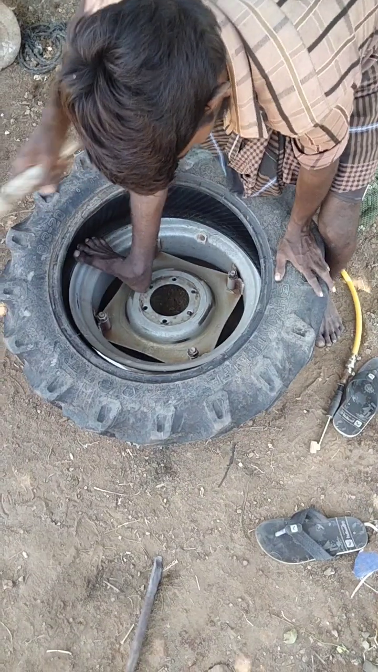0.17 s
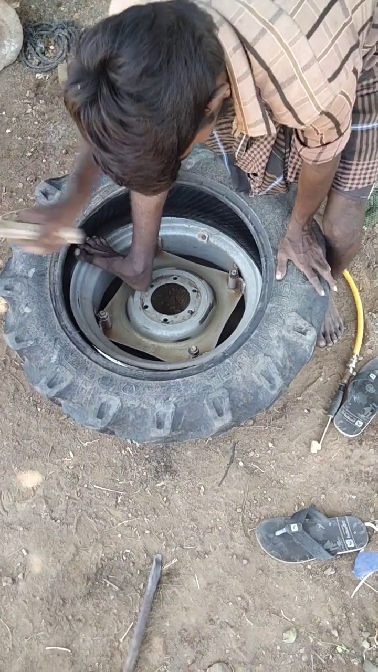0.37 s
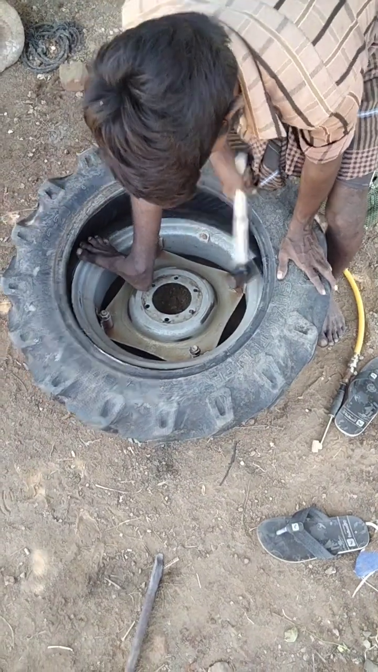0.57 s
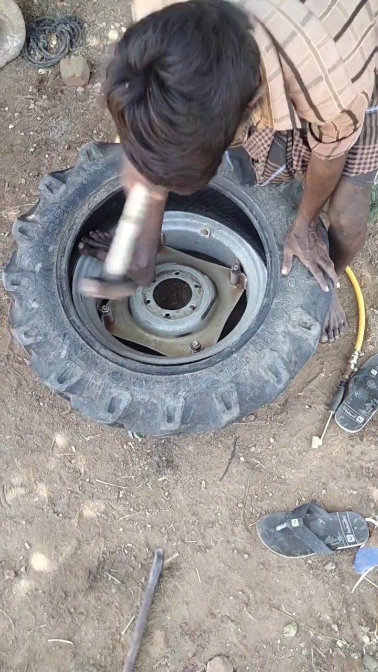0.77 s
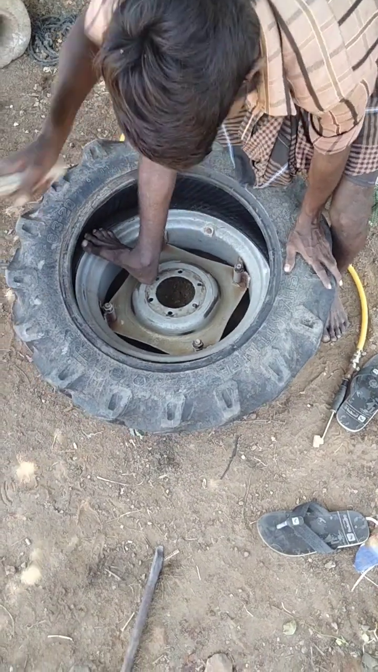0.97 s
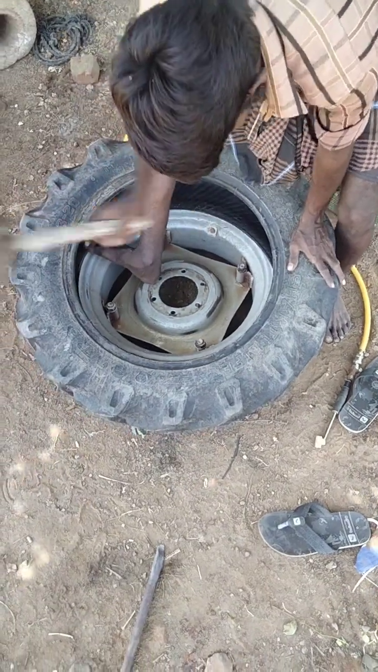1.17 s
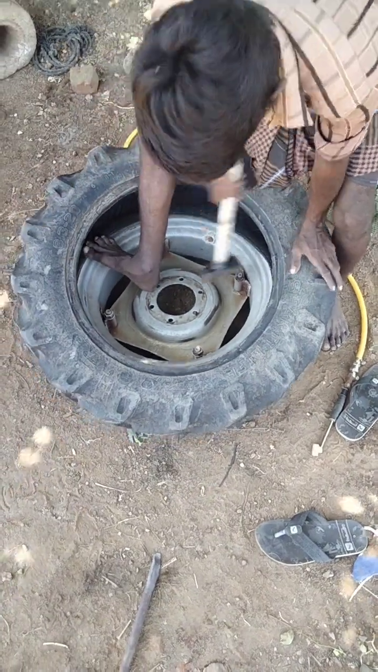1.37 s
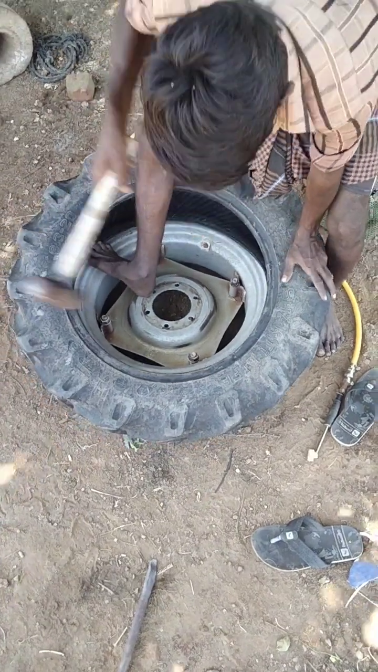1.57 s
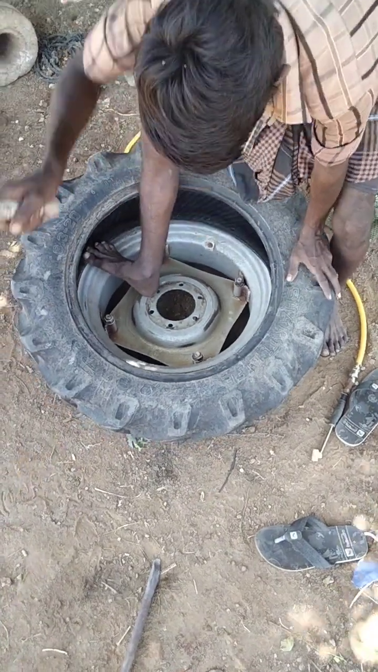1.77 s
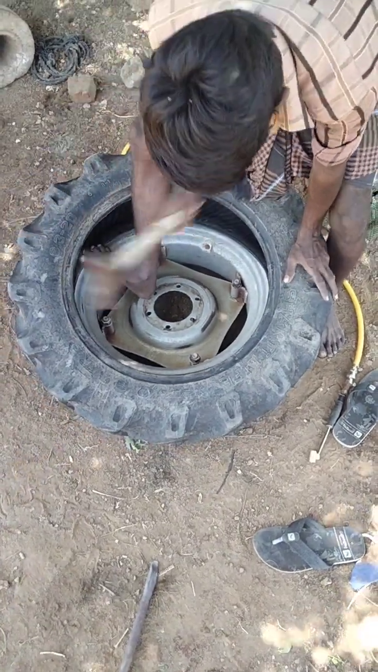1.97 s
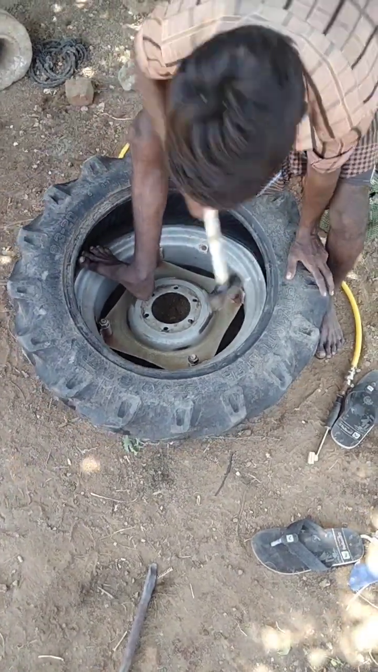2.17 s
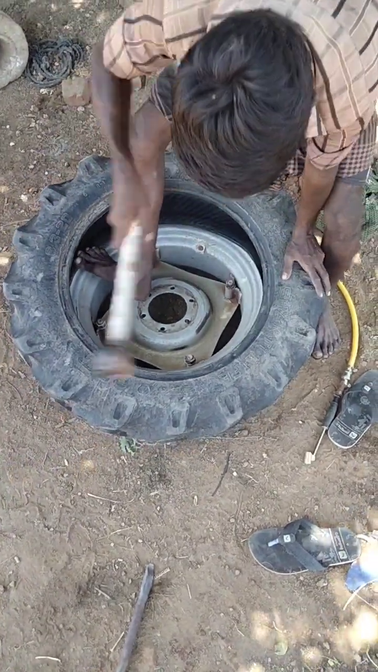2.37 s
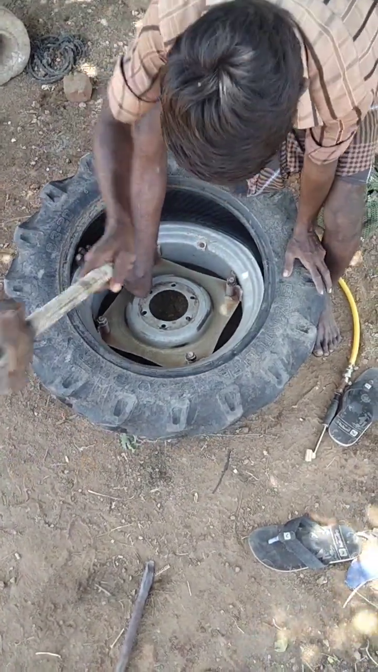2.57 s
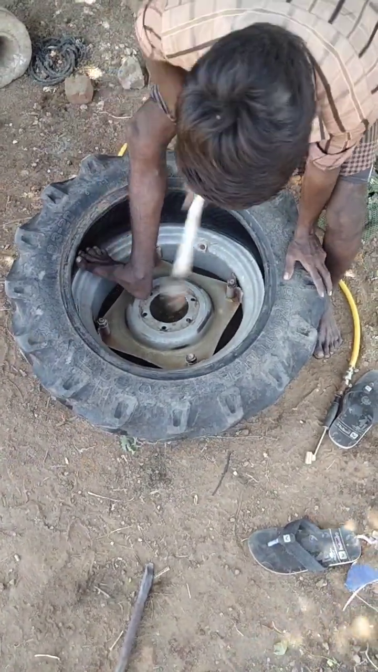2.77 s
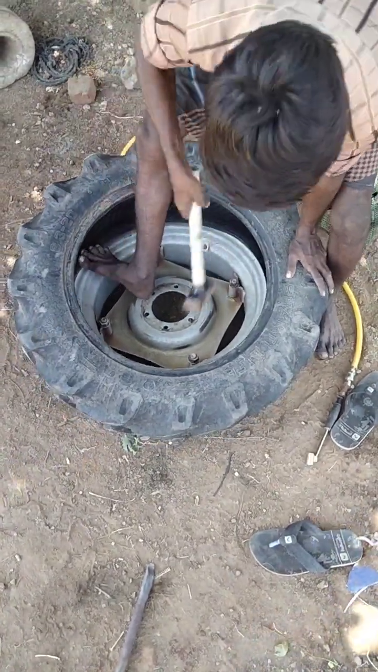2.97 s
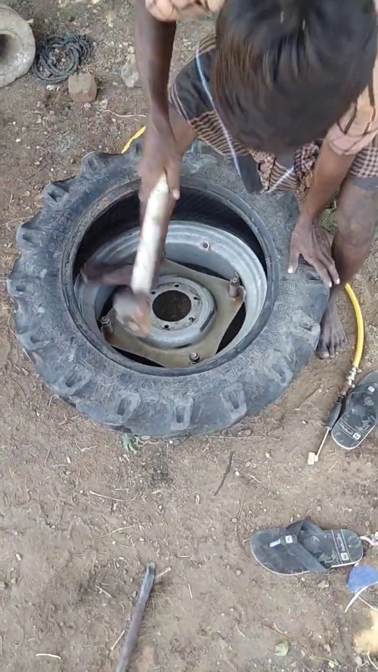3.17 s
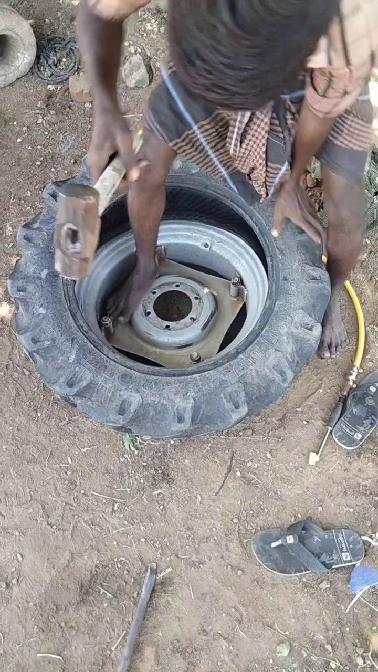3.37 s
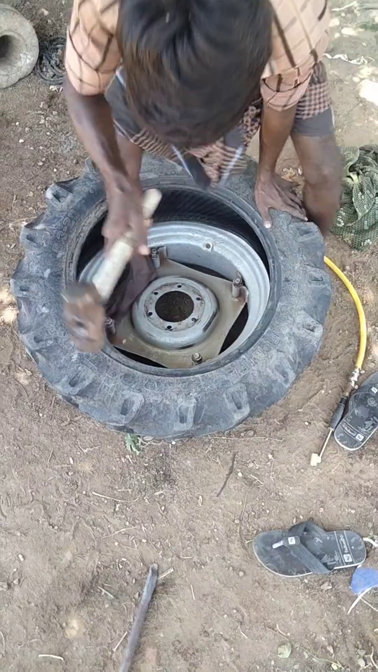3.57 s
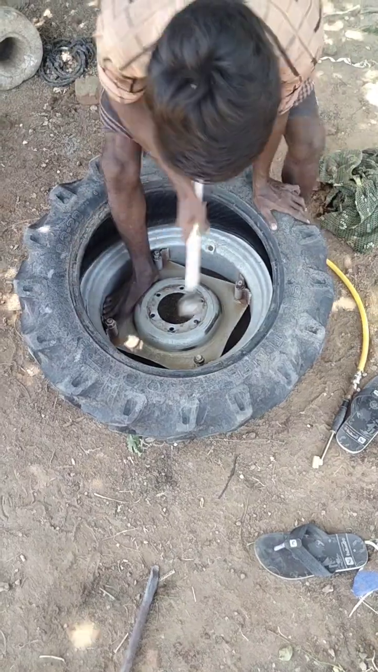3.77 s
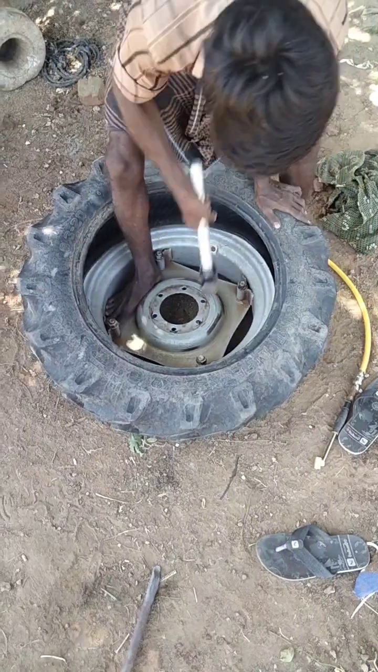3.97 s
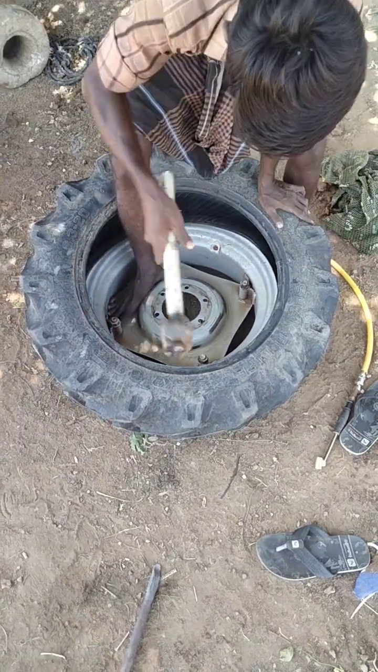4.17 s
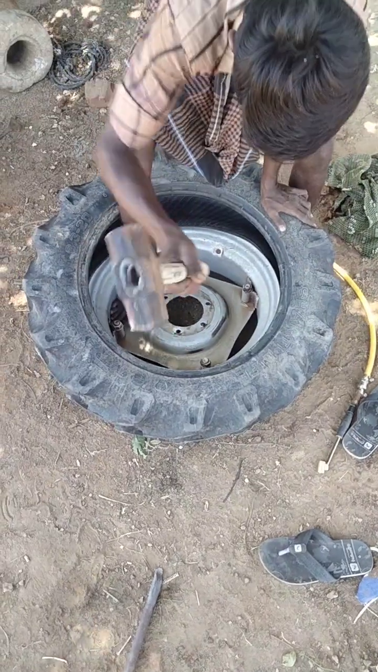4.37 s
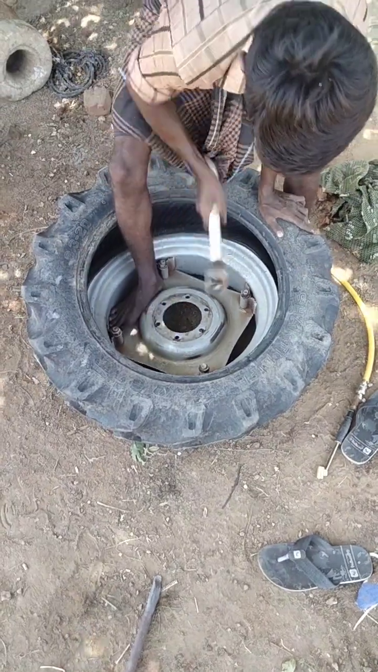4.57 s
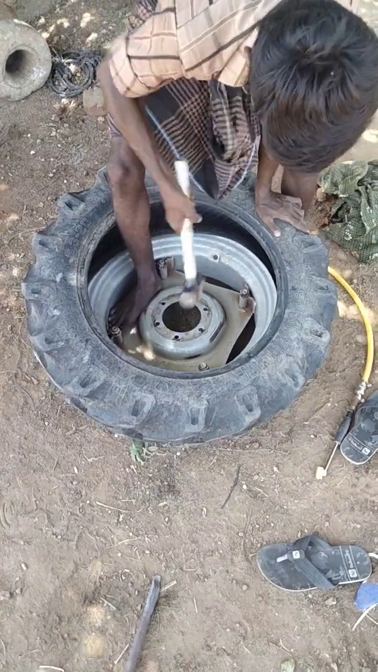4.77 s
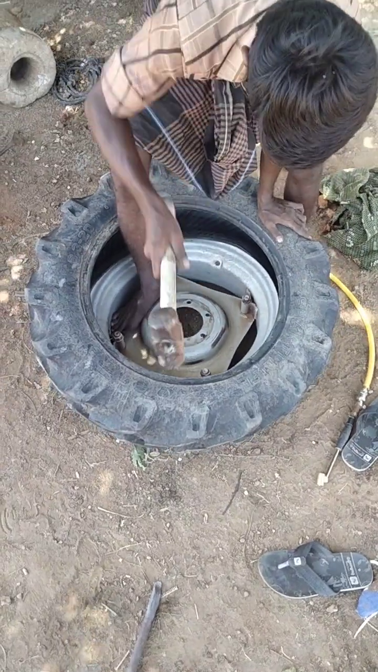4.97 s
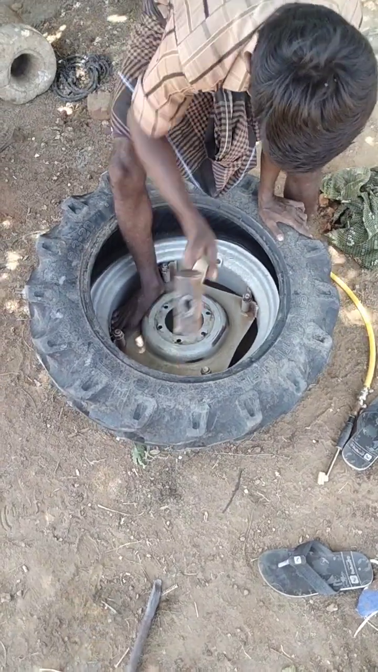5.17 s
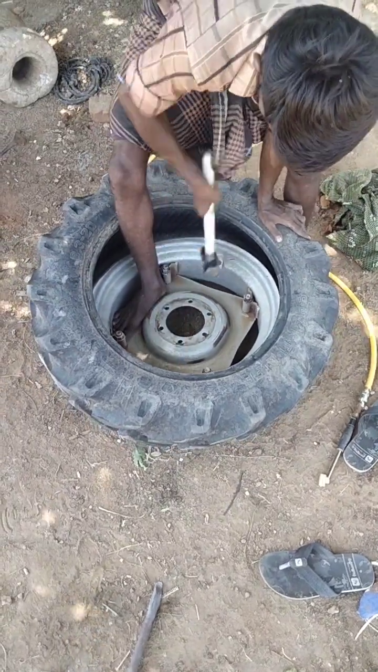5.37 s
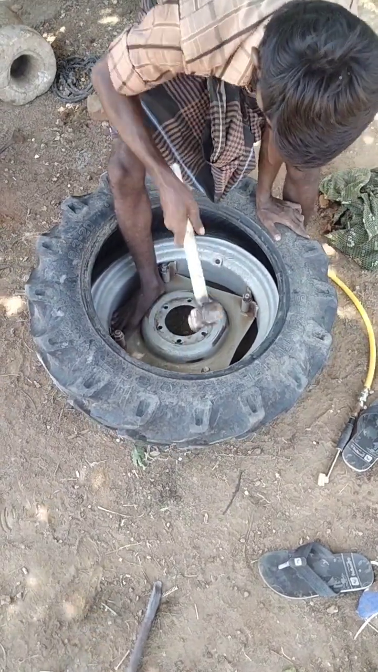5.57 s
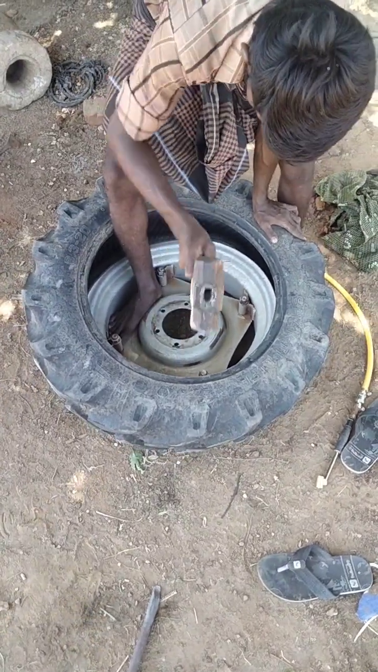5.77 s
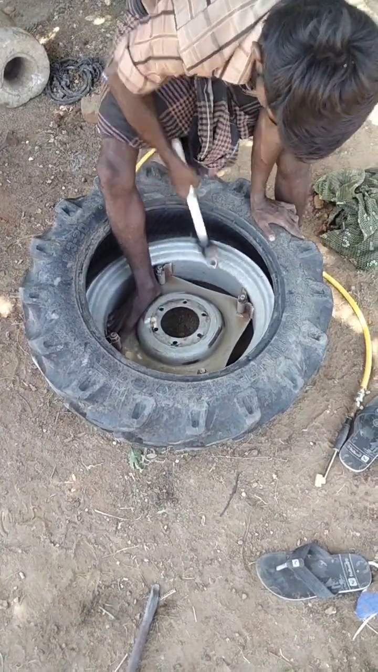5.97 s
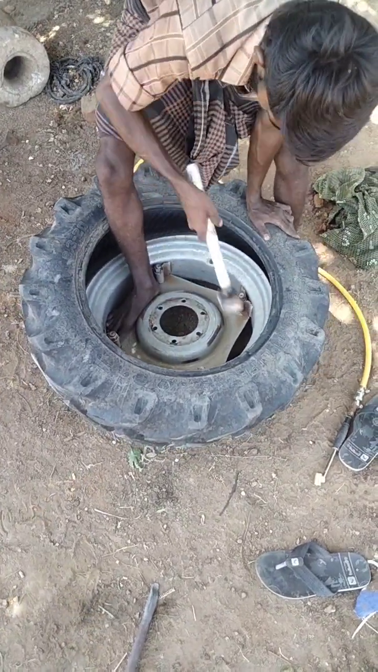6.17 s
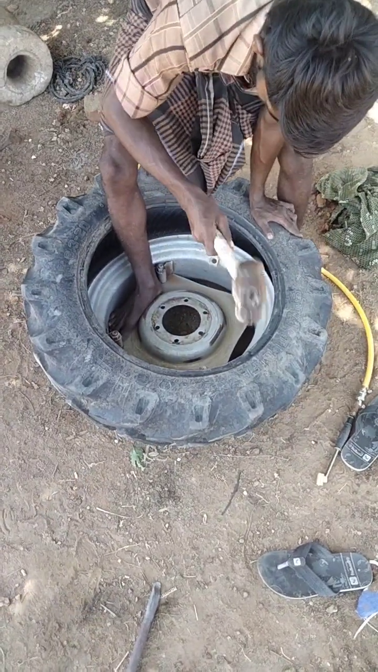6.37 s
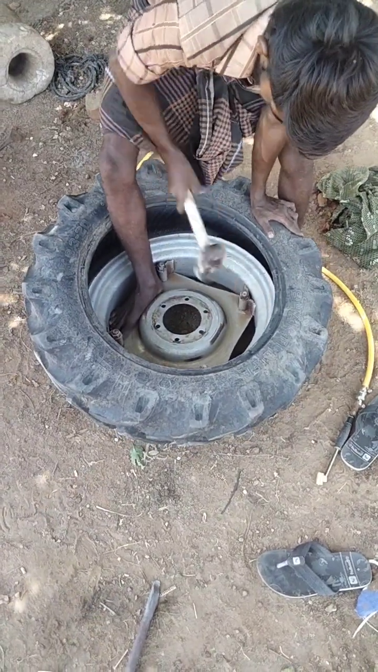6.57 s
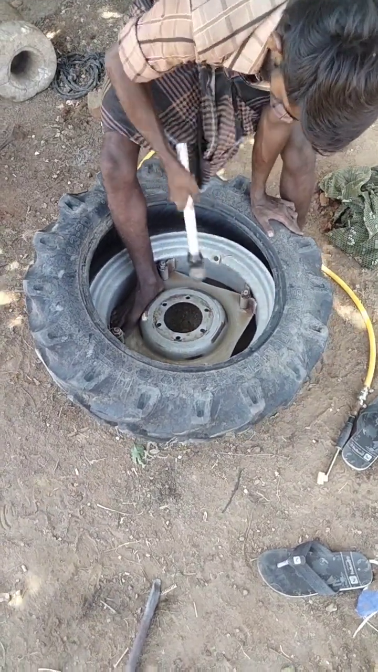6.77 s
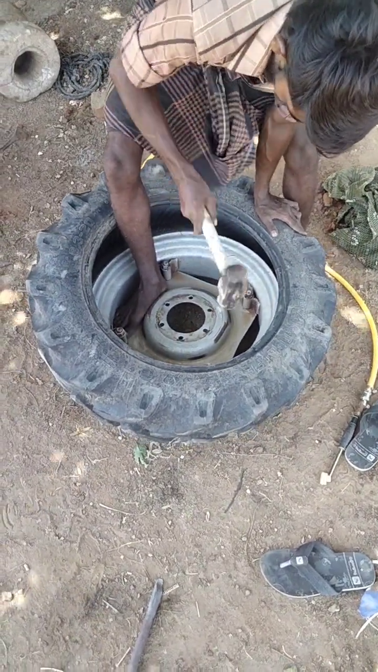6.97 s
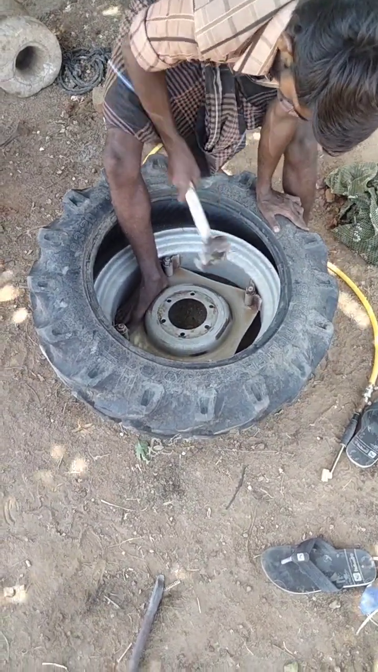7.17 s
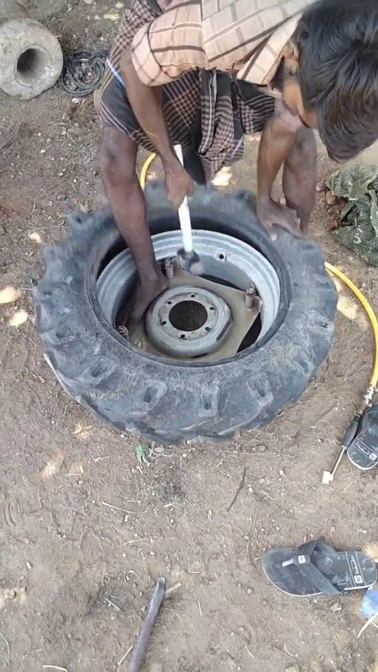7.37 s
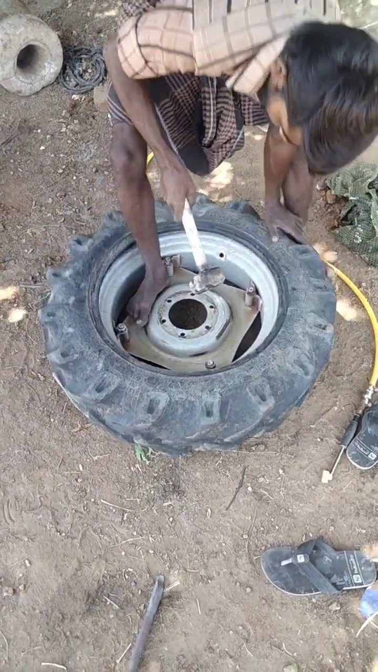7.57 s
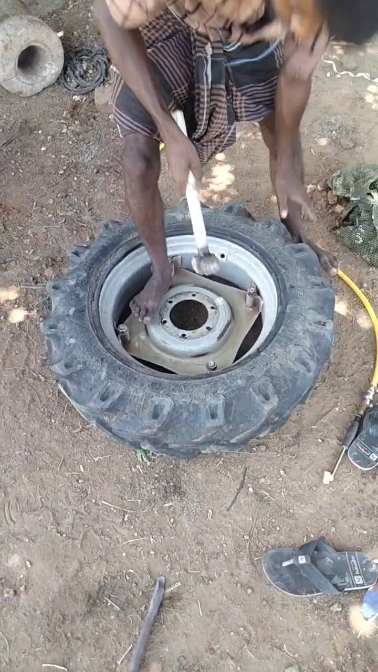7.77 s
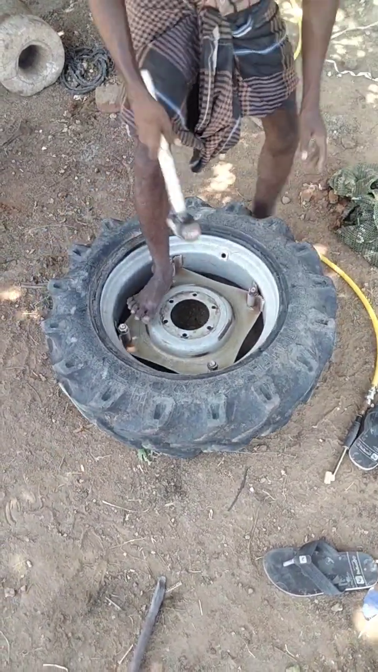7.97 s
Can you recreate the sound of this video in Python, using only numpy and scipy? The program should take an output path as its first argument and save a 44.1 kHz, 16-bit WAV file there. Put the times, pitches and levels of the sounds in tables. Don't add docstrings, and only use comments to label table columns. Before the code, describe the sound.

Ten spaced hammer blows land on a tractor tyre and steel rim, thudding and ringing, over a chugging compressor, thin air hiss and buffeting wind.

```python
import sys
import numpy as np
from scipy import signal
from scipy.fft import rfft, irfft, next_fast_len
from scipy.io import wavfile
from scipy.ndimage import uniform_filter1d, minimum_filter1d

SR = 44100
rng = np.random.default_rng(int(sys.argv[2]) if len(sys.argv) > 2 else 0)


def voltage_ratio(decibels):
    exponent = np.asarray(decibels, float) / 20
    return 10 ** exponent


def persist_wave(psi):
    counts = np.round(np.clip(psi, -1, 1) * 32767).astype(np.int16)
    wavfile.write(sys.argv[1], SR, np.atleast_2d(counts).T)


N = 353814
TURNS_PER_S = 12.331
RING_SIZE = 9000


def evened(x):
    return x / np.sqrt(np.mean(x ** 2) + 1e-20)


def read(points, hz):
    f, value = np.transpose(points)
    return np.interp(np.log(hz + 1), np.log(f + 1), value)


def add(mix, s, sound):
    part = mix[round(s * SR):][:len(sound)]
    part += sound[:len(part)]


def bumps(rows, t):
    return sum(high * np.exp(-(2 * (t - middle) / length) ** 2) for middle, length, high in rows)


def shaped(gain_at):
    size = next_fast_len(N, real=True)
    hz = np.fft.rfftfreq(size, 1 / SR)
    a, b = rng.standard_normal((2, len(hz)))
    return evened(irfft((a + 1j * b) * gain_at(hz), size)[:N])


def coloured(spectrum):
    return shaped(lambda hz: voltage_ratio(read(spectrum, hz)))


def fuzzy(centre_hz, width):
    return shaped(lambda hz: 1 / (1 + (2 * (hz - centre_hz) / width) ** 2))


def wander(top_hz):
    return fuzzy(0, 2 * top_hz)


def ring(hz, db, t60, start=0, size=RING_SIZE):
    t = np.arange(size)[:, None] / SR
    fade = voltage_ratio(-60 * t / t60) + voltage_ratio(-26.5 - 22 * t / t60)
    return voltage_ratio(db) * fade * np.sin(2 * np.pi * (hz * t + start)) * (1 - t / t[-1])


# frequency in Hz, level in dB per Hz.
YARD = [(59, -5), (100, 1), (166, -4.5), (295, -7.5), (424, -7), (535, -1), (634, -15), (930, -8.5),
        (1200, -16), (2130, -15.5), (4570, -20.5), (7290, -21), (8280, -12.5), (9210, -23), (16000, -25)]
# frequency in Hz, width in Hz, change in dB.
ECHOES = [(4600, 670, -6), (12200, 500, -2), (3150, 160, 3), (12700, 120, 5), (1620, 100, 2)]


def yard():
    level_db = -46 + 0.88 * wander(25)
    return voltage_ratio(level_db) * shaped(lambda hz: voltage_ratio(read(YARD, hz) + bumps(ECHOES, hz)))


# time in seconds, level in dB.
BREEZE = [(0, -47), (.2, -42.5), (1.3, -41.5), (1.9, -46), (2.2, -35.5), (2.7, -39.5), (3.6, -42.5),
          (4.1, -39), (4.6, -39.5), (5.0, -31), (5.4, -33.5), (5.7, -43.5), (6.3, -39), (6.8, -46),
          (7.2, -39), (8.02, -40)]
# middle in seconds, length in seconds, level in dB.
GUSTS = [(0.107, .08, -36.5), (0.445, .12, -38), (0.926, 0.044, -38), (1.67, 0.11, -37.5),
         (2.059, 0.039, -34), (2.163, 0.054, -34), (2.444, 0.081, -33.5), (2.572, 0.027, -35.5),
         (2.79, 0.058, -41), (2.937, .09, -33.5), (3.416, 0.054, -34.5), (3.856, 0.042, -36),
         (4.333, 0.078, -32.5), (4.58, 0.02, -28.5), (4.893, 0.06, -32.5), (5.04, 0.056, -29),
         (5.324, 0.043, -31), (5.39, 0.058, -30.5), (6.518, 0.17, -38.5), (6.69, 0.045, -39),
         (6.894, 0.042, -32), (7.09, 0.03, -43), (7.524, 0.054, -37), (7.674, .05, -31),
         (7.908, 0.044, -33.5), (5.6, 0.058, -42), (3.54, 0.076, -41)]
# frequency in Hz, level in dB per Hz.
BUFFET = [(12, 8), (30, -0.5), (60, 1.5), (100, -1.5), (170, -17.5), (300, -17.5), (600, -93)]
# frequency in Hz, level in dB per Hz.
ROAR = [(60, -34), (120, 5), (200, 3), (330, -11.5), (600, -43)]


def wind():
    t = np.arange(N) / SR
    breeze_db = np.interp(t, *np.transpose(BREEZE))
    breeze_power = voltage_ratio(2 * breeze_db + 3.1 * wander(4.3))
    gust_power = bumps([(s, length, voltage_ratio(2 * db)) for s, length, db in GUSTS], t)
    wind_db = 10 * np.log10(breeze_power + gust_power)
    roar_db = -49.0 + 1.86 * (wind_db + 34.5) + 5.16 * wander(40)
    rumble = voltage_ratio(wind_db + 2.3 * wander(13)) * coloured(BUFFET)
    return rumble + voltage_ratio(roar_db) * coloured(ROAR)


# frequency in Hz, width in Hz, level in dB.
LEAK = [(8900, 22, -66.5), (8580, 40, -61.5), (8080, 2000, -57), (4900, 40, -71), (8087, 45, -51.5)]


def leak():
    turns = np.cumsum(8128 + 11 * wander(2) + 11 * wander(25)) / SR
    level_db = -53 + 3 * wander(12) + 3.5 * wander(20)
    whistle = np.sqrt(2) * voltage_ratio(level_db) * np.sin(2 * np.pi * turns)
    return whistle + sum(voltage_ratio(db) * fuzzy(hz, width) for hz, width, db in LEAK)


# frequency in Hz, level in dB.
COMB = [(140, -69), (300, -64), (550, -70.5), (950, -69.5), (1300, -94.5)]
# frequency in Hz, level in dB.
STRONG_TONES = [(148, -59), (172.3, -58), (209.9, -55), (296.1, -48.5), (370, -55), (468.3, -56.5),
                (530.4, -58), (357.6, -58), (554.9, -59.5), (703, -68), (826, -95), (936, -59.5),
                (234.3, -55.5), (394.6, -58.5), (764.5, -71), (222, -61), (1300, -69), (320.6, -60),
                (481, -61), (542.6, -61), (617, -64), (690.5, -62), (814, -63), (974, -69), (863, -72),
                (666, -72), (888, -65), (604, -74)]


def shaft(turns):
    order = np.arange(11, 110)
    db = read(COMB, order * TURNS_PER_S) + 4.27 * rng.standard_normal(len(order))
    for hz, line_db in STRONG_TONES:
        db[np.argmin(abs(order * TURNS_PER_S - hz))] = line_db
    one_turn = np.arange(2048)[:, None] / 2048
    waves = np.cos(2 * np.pi * (order * one_turn + rng.random(len(order))))
    pattern = (np.sqrt(2) * voltage_ratio(db) * waves).sum(axis=1)
    slip = .0007 * wander(2)
    return np.interp(turns + slip, one_turn[:, 0], pattern, period=1) * voltage_ratio(0.91 * wander(6.5))


VALVE_S = .0715
# middle in seconds, length in seconds, extra dB.
HARD_SEATS = [(.65, 0.12, 6.5), (1.63, 0.059, 4), (3.24, 0.057, 4.5), (5.15, 0.073, 9), (5.36, 0.13, 3),
              (5.6, 0.1, 4), (6.25, 0.32, 5.5), (6.75, 0.14, 2.5)]
# seconds after opening, length in seconds, height.
BOUNCES = [(.002, .007, 2.5), (.011, .005, 1.05), (.0195, .007, 1.75), (.030, .008, .5), (.041, .007, .65)]
# frequency in Hz, width in Hz, level in dB, dying time in seconds.
PUFFS = [(10050, 300, -56, 0.022), (9650, 400, -58, .016), (13800, 250, -64, .025),
         (13300, 1500, -62, .008), (7100, 300, -62, 0.006)]
# seconds after opening, length in seconds, level in dB, frequency in Hz.
CLACKS = [
    (.0015, .005, -58, 3950),
    (0.059, 0.004, -59, 3900),
    (.059, .004, -60, 2700),
    (.002, .005, -58, 1380),
]


def valve(turns):
    since = turns % 1 / TURNS_PER_S
    seat_db = bumps(HARD_SEATS, VALVE_S + (np.arange(-1, 199) + .2) / TURNS_PER_S)
    turn_db = seat_db + 1.6 * rng.standard_normal(200)
    strength = voltage_ratio(turn_db[np.floor(turns).astype(int) + 1])
    rise = 1 - np.exp(-since / .0006)
    pitch = 2090 + (2290 - 2090) * np.exp(-since / .009) + 25 * wander(80)
    tone = np.sin(2 * np.pi * np.cumsum(pitch) / SR) + .3 * fuzzy(2150, 360)
    reed = voltage_ratio(-55.5 + 1.1 * wander(60)) * tone * bumps(BOUNCES, since)
    puffs = 0
    for hz, width, db, dying in PUFFS:
        puffs = puffs + voltage_ratio(db) * fuzzy(hz, width) * np.exp(-(since / dying) ** 1.6 / 2)
    clacks = 0
    for s, length, db, hz in CLACKS:
        clacks = clacks + bumps([(s, length, voltage_ratio(db))], since) * fuzzy(hz, 0.17 * hz)
    return strength * (rise * (reed + puffs) + clacks)


# start in seconds, length in seconds, level in dB, middle frequency in Hz.
BRUSHES = [(2.233, 0.1, -42, 4000), (3.507, 0.086, -49, 12000), (7.552, 0.1, -50, 11000),
           (0.727, .06, -47, 12000), (6.135, 0.065, -38.5, 4900), (6.137, 0.1, -50, 13000),
           (2.992, .05, -37, 15000), (4.008, .07, -47, 14000), (3.5, .05, -43, 14000)]


def brushes(out):
    for s, length, db, hz in BRUSHES:
        window = np.hanning(round(length * SR))
        add(out, s, voltage_ratio(db) * fuzzy(hz, 2.1 * hz)[:len(window)] * window)


# frequency in Hz, level in dB, time to fade by 60 dB in seconds.
WHEEL = [(245, -7, 0.1), (297, -4, .16), (331, -3, 0.16), (433, -7, 0.15), (469, 0.5, 0.17),
         (481, -10, 0.2), (531, -1, 0.24), (614, -4, 0.17), (700, -2.5, 0.035)]


def thud(push_db, push_hz, boom_db, boom_hz, free, hum, chance):
    t = np.arange(RING_SIZE) / SR
    turn = t * push_hz
    swing = np.cos(2 * np.pi * (turn - .97)) + .15 * np.cos(4 * np.pi * (turn - .9))
    push = (turn / .9) ** 3 * np.exp(3 - 3 * turn / .9) * swing
    boom_t60 = free * 0.12 * (boom_hz / 129) ** -0.63
    boom = -ring(boom_hz * np.array([1, 1.35]), np.array([0, -6.]), boom_t60).sum(axis=1)
    hz, db, t60 = np.transpose(WHEEL)
    hum_db, pair_db, upper_db, decay = hum
    tilt_db = (-4 + 0.3 * (hum_db + 15.5)) * np.log2(hz / 330)
    colour_db = hum_db + tilt_db + bumps([(472, 60, pair_db), (531, 30, upper_db)], hz)
    wheel = ring(hz, db + colour_db, t60 * decay, start=chance).sum(axis=1)
    build = 1 - np.exp(-(t / .005) ** 2)
    return voltage_ratio(push_db) * push + voltage_ratio(boom_db) * boom + wheel * build


# start in seconds, push level in dB, push frequency in Hz,
# boom level in dB, boom frequency in Hz.
THUDS = [(.7220, -7.5, 442, -21.5, 168), (1.4633, -6.5, 447, -23.5, 147), (2.222, -4.5, 465, -18, 139),
         (2.9855, -4.5, 450, -22, 159), (4.0107, -5.5, 432, -15, 162), (4.7693, -11, 450, -22.5, 139),
         (5.4592, -15, 400, -22, 139), (6.129, -15, 413, -12.5, 144.6), (6.7885, -16, 400, -17, 131),
         (7.4008, -14, 340, -12.5, 128), (7.559, -23, 273, -15, 231), (7.6100, -16, 700, -18, 146),
         (7.6175, -12, 173, -14.5, 113.5), (7.6640, -24, 307, -17, 132), (7.756, -39, 223, -27.5, 190),
         (7.8, -25, 520, -44, 112), (.0000, -34, 400, -48, 150), (7.8110, -40, 204, -26, 110)]
# level in dB, lift of the main pair of notes in dB,
# lift of the note above in dB, stretch of the fading time.
HUMS = [(-21, -5.5, 0.1, 1.08), (-23, 4, 3, 1.8), (-19, 4, 0.1, 1.13), (-20, 3, 3, 1), (-14.5, -3, -5, 0.8),
        (-24.5, 9, 5, 1), (-27, 12, 0.1, 1.1), (-16.5, -3, -10, 0.9), (-24, 7.5, 8, 1.15),
        (-15, -12, 1, 0.9), (-36, 9, 0.1, .5), (-26, 13, -4, 0.5), (-30, -10, .1, .8), (-31, 3, 0.1, 0.5),
        (-32, 0, 0.1, 0.3), (-31, 3, 11, 0.62), (-33, -13, 0.1, 1.2), (-33, 2, 0.1, 0.57)]


def thuds(out):
    drop_s, free_ring = 7.5, 1.56
    for row, hum, chance in zip(THUDS, HUMS, rng.random((20, len(WHEEL)))):
        free = free_ring if row[0] > drop_s else 1
        add(out, row[0], thud(*row[1:], free, hum, chance))


def slopes(hz, top_hz, rise_db, fall_db):
    octaves = np.log2((hz + 1) / top_hz)
    return np.where(octaves < 0, rise_db, -fall_db) * octaves


def contact(hz, knock_db, knock_hz, fall_db, tick_db):
    knock = voltage_ratio(knock_db + slopes(hz, knock_hz, 6, fall_db))
    sheen_db = bumps([(14400, 2600, 11.5)], hz)
    tick = voltage_ratio(tick_db + slopes(hz, 5800, 34.5, 19.5) + sheen_db)
    return np.hypot(knock, tick)


# frequency in Hz, level in dB, time to fade by 60 dB in seconds.
RIM = [(789, -5.5, 0.13), (890, -14, 0.2), (998, -5, 0.09), (1190, -11, 0.08), (1318, -7, 0.13),
       (1750, -16, 0.12), (1911, -16, 0.3), (2030, -16, 0.11), (2390, -8, 0.15), (2500, -13, .15),
       (2686, -11, 0.2), (2812, -7, 0.14), (3236, -8, 0.14), (3666, -11, 0.15), (3908, -9, 0.14),
       (4545, -8, 0.09), (5510, -8, 0.09), (6052, -8, .14), (7192, -9, 0.15)]


def clank(blow, plate_db, chance):
    t = np.arange(len(chance)) / SR
    hz, db, t60 = np.transpose(RIM)
    modes = contact(hz, *blow) * ring(hz, db + 2.0 * chance[:len(hz)], t60, start=chance[-len(hz):])
    clear = (modes * (1 - np.exp(-t[:, None] * hz / 0.51))).sum(axis=1)
    bins = np.fft.rfftfreq(len(t), 1 / SR)
    gain = contact(bins, *blow) * voltage_ratio(plate_db) / (1 + (1400 / (bins + 1)) ** 4)
    wash = irfft(rfft(chance) * gain, len(t))
    chatter_db = 3.5 * evened(uniform_filter1d(chance[::-1], size=70)) - 1.5
    dense = voltage_ratio(4.5 + chatter_db - 60 * t / 0.2)
    crack_db = 13.5 + 0.56 * (blow[-1] - blow[0])
    shape = dense + voltage_ratio(crack_db) * np.exp(-t / 0.001)
    return clear + wash * shape * (1 - np.exp(-t / 0.00038))


# frequency in Hz, width in Hz, lift in dB.
PLATE = [(3260, 250, 3.5), (3900.0, 76, 20), (4570, 93, 0), (5090, 110, 22), (6050, 120, 10),
         (8860, 280, 23), (9630, 110.0, 22), (9960, 210.0, 14), (10200, 85, 13), (10600, 120, 5),
         (13400, 130, -2), (13800, 220.0, 14.0), (14770.0, 60.0, 12.0), (15500, 230.0, 12.0)]
# start in seconds, knock level in dB, knock frequency in Hz,
# fall above it in dB per octave, bright tick level in dB.
CLANKS = [(.7250, -27.5, 900, 11.5, -44), (1.4730, -22.5, 1320, 9, -34.5), (2.225, -31, 1350, 11, -42),
          (2.992, -16.5, 1210, 10.5, -35), (4.0120, -33, 900, 13, -40), (4.7717, -20, 900, 5, -30.5),
          (5.4621, -22, 900, 3.5, -25.5), (6.1300, -32, 900, 10, -41), (6.7907, -28, 900, 8.5, -22.5),
          (7.4091, -24, 1300, 11, -31), (7.5600, -32, 1330, 17, -66), (7.6100, -30, 1130, 17, -60),
          (7.6660, -28, 900, 18, -58), (7.8000, -38, 900, 25, -63), (.0000, -34, 900, 27, -51),
          (2.9930, -24.5, 2880, 32, -55), (7.4120, -27.5, 2480, 12.5, -25)]


def clanks(out):
    plate_db = 3 * evened(uniform_filter1d(rng.standard_normal(RING_SIZE // 2 + 1), size=11))
    plate_db = plate_db + 0.54 * bumps(PLATE, np.fft.rfftfreq(RING_SIZE, 1 / SR))
    for row, chance in zip(CLANKS, rng.standard_normal((20, RING_SIZE))):
        add(out, row[0], clank(row[1:], plate_db, chance))


# start
# in seconds, frequency in Hz, level in dB, time to fade by 60 dB in seconds.
FAVOURED = [(.7290, 2440, -43.5, 0.23), (1.4740, 1318, -18.5, 0.135), (1.4720, 1012, -33, 0.18),
            (2.2260, 600, -22, 0.25), (2.993, 2940, -42, 0.2), (2.9920, 2390, -40, 0.3),
            (2.9920, 4090, -38, 0.15), (2.9920, 3236, -31, 0.12), (2.993, 1184, -21, 0.15),
            (2.9920, 535, -27, 0.55), (4.0130, 1100, -33.5, 0.056), (4.7720, 940, -39, 0.6),
            (4.7720, 2680, -32, 0.09), (5.4620, 3897, -34, 0.2), (5.4620, 930, -41, 1),
            (5.4620, 8478, -34, 0.12), (5.4620, 2048, -36, .13), (5.4610, 788, -24, 0.07),
            (6.1300, 937, -46, 0.23), (6.7910, 13680, -34, .12), (6.792, 1700, -33, 0.025),
            (6.790, 907, -24, 0.1), (7.4090, 2392, -29.5, 0.2), (7.41, 1911, -29, 0.19),
            (7.5600, 2403, -44, .2), (6.132, 308, -18, 0.18), (7.5580, 200, -23, .082),
            (7.6220, 1370, -41, 0.2), (5.462, 8877, -33, 0.12), (7.4100, 7808, -33, 0.14),
            (5.462, 7843, -36, .12), (5.462, 7576, -37, .12), (7.41, 8473, -34, .12),
            (7.41, 6449, -37, .12), (4.772, 794, -25, .11), (4.7725, 995, -22, .09),
            (4.772, 1345, -26, .13), (4.772, 7975, -40, .12), (2.992, 2807, -35, .25),
            (2.992, 1060, -29, .1), (7.561, 1316, -36, .06), (7.561, 1940, -44, .12),
            (7.612, 920, -29, .05), (7.668, 800, -32, .05), (7.668, 1370, -42, .1), (1.474, 3235, -46, .2),
            (1.474, 4048, -46, .2), (6.791, 2690, -42, .15), (6.791, 1190, -31, .12),
            (2.991, 470, -8.5, .13), (2.992, 526, -16, .28), (3.0, 610, -33, .25), (4.012, 785, -29, .06),
         (4.013, 690, -36, .12), (4.78, 522, -32, .4), (5.472, 538, -26, .25), (5.47, 300, -34, .2),
         (6.13, 785, -27, .06), (6.795, 433, -28, .15), (7.402, 436, -18, .06), (7.558, 428, -27, .1),
         (7.611, 650, -25, .045), (7.801, 895, -37, .08), (7.41, 885, -36, .12), (7.81, 245, -33, .15),
         (2.222, 1240, -29, .06), (2.23, 1911, -43, .25), (2.232, 2400, -44, .15), (2.232, 2812, -42, .05),
         (.724, 1170, -33, .12), (.726, 900, -33, .15), (1.474, 1195, -32, .1), (4.011, 1190, -34, .05),
         (6.13, 95, -21, .2), (6.13, 1150, -36, .05), (6.791, 998, -30, .08), (2.992, 1911, -38, .3),
         (2.992, 2686, -36, .3), (2.994, 3666, -42, .35), (2.992, 1315, -28, .22), (5.462, 2825, -30, .06),
         (5.462, 1911, -42, .4), (6.135, 2390, -46, .12), (6.14, 3236, -46, .15), (1.474, 1892, -42, .25),
         (1.474, 5536, -44, .15), (1.474, 4543, -45, .15)]


def single_notes(out):
    t = np.arange(14000) / SR
    for s, hz, db, t60 in FAVOURED:
        pair = ring(hz + np.array([0, 24.2]), db + np.array([0, -11]), t60, size=len(t))
        add(out, s, pair.sum(axis=1) * (1 - np.exp(-t * hz / 1.7)))


# middle in seconds, peak in dB, contact in seconds.
REBOUNDS = [(.7241, -13, .0011), (1.4654, -15, .0011), (4.7748, -8, .0009), (5.4656, -10, .0011),
            (6.7938, -8, .0011), (7.4052, -13, .002)]


def rebounds(out):
    for s, db, touch in REBOUNDS:
        u = np.arange(-3 * touch, 3 * touch, 1 / SR) / touch
        add(out, s - 3 * touch, voltage_ratio(db) * (np.exp(-8 * u ** 2) - .3 * np.exp(-.72 * u ** 2)))


def hammer():
    out = np.zeros(N)
    brushes(out)
    thuds(out)
    clanks(out)
    single_notes(out)
    rebounds(out)
    return out


def scene():
    turns = (np.arange(N) / SR - VALVE_S) * TURNS_PER_S
    compressor = leak() + shaft(turns) + valve(turns)
    return (yard() + wind() + compressor + hammer())[None]


def low_pass(x):
    return signal.sosfilt(signal.butter(12, 16790, fs=SR, output="sos"), x)


def record(dry):
    ceiling_db, hold_s, release_s, edge_hz = -6.2, .098, .012, 15830
    gain = np.minimum(voltage_ratio(ceiling_db) / (abs(dry[0]) + 1e-9), 1)
    hold, ahead = round(hold_s * SR), 130
    padded = np.r_[np.ones(hold), gain, np.ones(hold)]
    held = minimum_filter1d(padded, hold)[hold // 2 + ahead:][:N]
    keep = np.exp(-1 / (release_s * SR))
    eased = 1 - signal.lfilter([1 - keep], [1, -keep], 1 - held)
    limited = dry * uniform_filter1d(np.minimum(held, eased), size=ahead)
    edge = signal.firwin(401, edge_hz, window=("kaiser", 6), fs=SR)
    return low_pass(signal.oaconvolve(limited, edge[None], "same"))


dry = scene()
out = record(dry)
persist_wave(out)
```